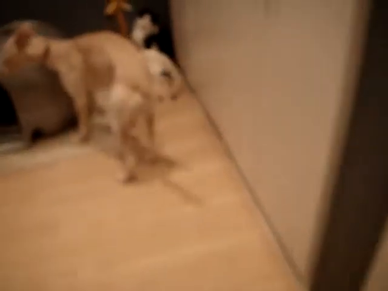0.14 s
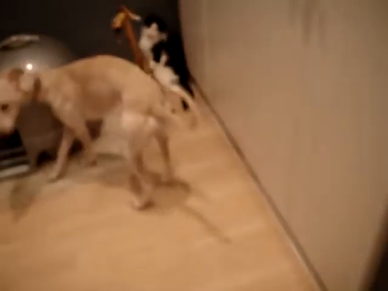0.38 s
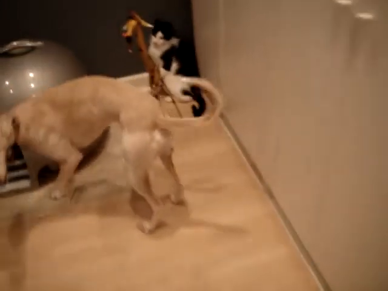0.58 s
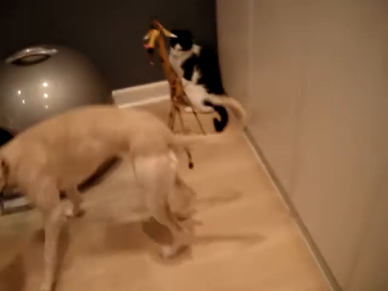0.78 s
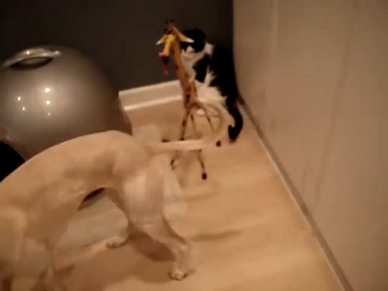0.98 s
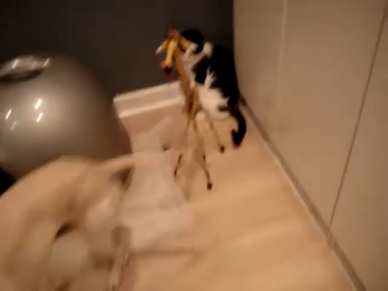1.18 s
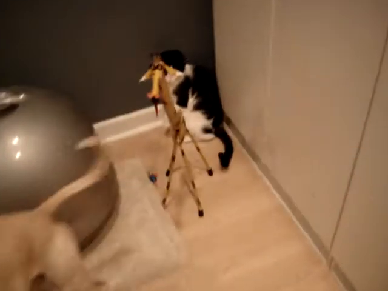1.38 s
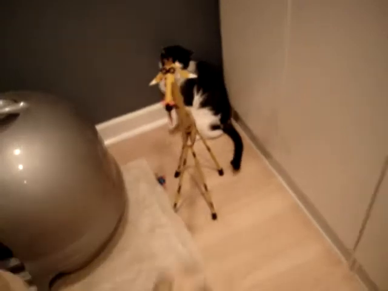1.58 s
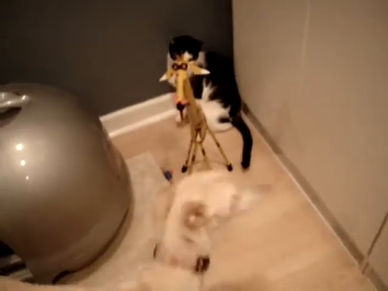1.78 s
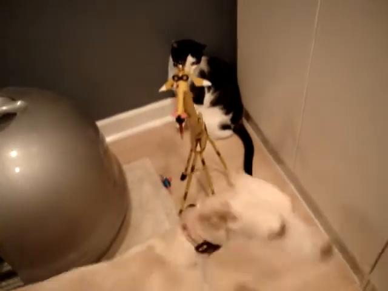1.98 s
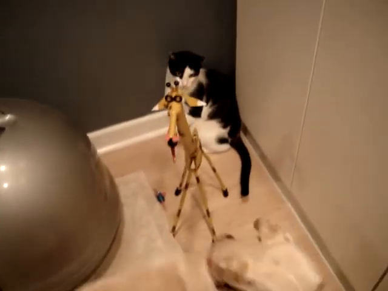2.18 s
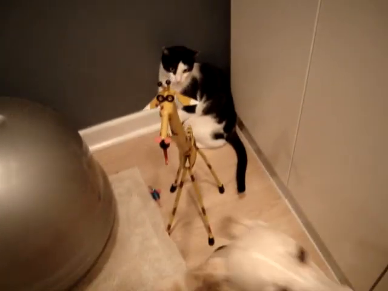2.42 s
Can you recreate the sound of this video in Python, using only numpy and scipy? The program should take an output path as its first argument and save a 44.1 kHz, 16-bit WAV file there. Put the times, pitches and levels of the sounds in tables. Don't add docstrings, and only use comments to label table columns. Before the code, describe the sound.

Dog claws skid and scrabble on a laminate floor, with panting breaths and jingling collar tags

```python
import sys
import numpy as np
from scipy import signal
from scipy.fft import rfft, irfft, next_fast_len
from scipy.io import wavfile
from scipy.ndimage import uniform_filter1d

SR = 44100
rng = np.random.default_rng(int(sys.argv[2]) if len(sys.argv) > 2 else 0)


def master_out(mix):
    frames = np.transpose(np.atleast_2d(mix))
    ceiling = np.clip(frames, -1, 1)
    pcm = np.round(ceiling * 32767).astype(np.int16)
    wavfile.write(sys.argv[1], SR, pcm)


def ratio_of_db(decibels):
    return 10 ** (np.asarray(decibels, float) / 20)


N = 108045


def band(x, low_hz, high_hz):
    return signal.sosfilt(signal.butter(2, [low_hz, high_hz], "band", fs=SR, output="sos"), x)


def rms_one(x):
    return x / np.sqrt(np.mean(x ** 2) + 1e-20)


def drift(rate_hz):
    r = np.exp(-80 * np.pi * rate_hz / SR)
    white = rng.standard_normal(N // 40 + 2002)
    slow = signal.lfilter([1], [1, -2 * r, r * r], white)[2000:]
    return np.interp(np.arange(N) / 40, np.arange(len(slow)), rms_one(slow))


def ring(x, hz, t60):
    r = ratio_of_db(-60 / (max(t60, .005) * SR))
    w = 2 * np.pi * hz / SR
    return signal.lfilter([0, np.sin(w)], [1, -2 * r * np.cos(w), r * r], x + 1e-18)


def peak(x, hz, width_hz):
    r = np.exp(-np.pi * width_hz / SR)
    poles = [1, -2 * r * np.cos(2 * np.pi * hz / SR), r * r]
    return signal.lfilter([(1 - r * r) / 2, 0, (r * r - 1) / 2], poles, x)


def grains(per_s, spread_db):
    sizes = ratio_of_db(spread_db * np.minimum(rng.exponential(1, N), 4)) * rng.choice([-1, 1], N)
    return rms_one(sizes * (rng.random(N) < per_s / SR))


def strokes(rows, source, width_oct, fall_db, swell, patchy_db):
    crest_db, attack_s, light_below_hz = 12.5, 0.00088, 247
    strike, strike_s = 0.81, 0.0016
    narrowing = 0.39
    s, db, hold, t60, hz = np.transpose(rows)[:, :, None]
    t = np.arange(0, N + 32, 16) / SR - s
    rise = np.clip(t / (hold if swell else attack_s), 0, 1)
    if not swell:
        rise = rise * (1 + strike * np.exp(-np.abs(t) / strike_s))
    fade_db = 60 * np.maximum(t - hold, 0) / t60
    power = (rise * ratio_of_db(db - crest_db - fade_db)) ** 2

    edges = 100 * 2 ** np.arange(0, 7, 1 / 3)
    mids = np.sqrt(edges[1:] * edges[:-1])
    widths_away = np.log2(mids / hz) / width_oct * np.maximum(hz / 5500, 1) ** narrowing
    share = ratio_of_db(-2 * fall_db * widths_away ** 2)
    share = share / share.sum(axis=1, keepdims=True)
    out = 0
    for k in range(len(mids)):
        gain = np.interp(np.arange(N) / 16, np.arange(t.shape[1]), np.sqrt(share[:, k] @ power))
        noise = rms_one(band(source[k % 2], edges[k], edges[k + 1]))
        out = out + gain * ratio_of_db(patchy_db * drift(31)) * noise
    return signal.sosfilt(signal.butter(4, light_below_hz, "high", fs=SR, output="sos"), out)


def knocks(rows, contact_s):
    out, size = np.zeros(N), int(contact_s * SR)
    rough = rng.standard_normal((len(rows), 2000))
    for (s, db, hz, t60), noise in zip(rows, rough):
        start = int(s * SR)
        push = np.zeros(N)
        push[start:start + size] = noise[:size] * np.linspace(1, 0, size)
        tone = peak(ring(push, hz, t60), hz, hz / 2)
        out += ratio_of_db(db) * tone / np.abs(tone).max()
    return out


# (f [Hz], level [dB per Hz])
AIR_COLOUR = [(20, -7), (256, -2.5), (340, 3), (544, -4), (1390, -5), (3020, -11.5), (4500, -7.5),
              (9000, -7.5)]
# (t [s], level [dB])
BUSTLE = [
    (0, -45.5),
    (1.3, -44.5),
    (1.39, -46.5),
    (1.501, -44.5),
    (2.17, -50.5),
    (2.27, -58),
    (2.45, -54.5),
]


def air():
    edges = 20 * 2 ** np.arange(0, 9.4, .5)
    white = rng.standard_normal((2, N))
    hz, db = np.transpose(AIR_COLOUR)
    together = drift(8)
    out = 0
    for k in range(len(edges) - 1):
        level_db = np.interp(np.log(edges[k] * 2 ** .25), np.log(hz), db)
        gain = ratio_of_db(level_db + 1.8 * drift(10) + together)
        out = out + gain * band(white[k % 2], edges[k], edges[k + 1])
    return rms_one(out) * ratio_of_db(np.interp(np.arange(N) / SR, *np.transpose(BUSTLE)))


# (t [s], length [s], f [Hz], level [dB])
WHISTLES = [(0, 1.3, 1450, -64), (.62, .2, 2450, -56), (1.0, .15, 2500, -55), (1.17, .09, 3850, -46),
            (1.995, .09, 3790, -46), (2.105, .09, 3820, -45), (2.105, .04, 3350, -49), (2.2, .1, 3780, -59),
            (2.338, .06, 3780, -51), (2.25, .1, 1400, -65), (1.88, .05, 3300, -42)]


def hollow():
    width_hz, fade_s = 130, .01
    t, white, out = np.arange(N) / SR, rng.standard_normal(N), 0
    for s, length, hz, db in WHISTLES:
        tone = peak(peak(white, hz, width_hz), hz, width_hz)
        tone = tone / uniform_filter1d(tone ** 2 + 1e-12, size=200) ** .25
        fade = np.clip(np.minimum(t - s, s + length - t) / fade_s, 0, 1)
        out = out + ratio_of_db(db) * fade * rms_one(tone)
    return out


def room(x):
    t60_s, wall_cut_hz = 0.29, 21000
    size = next_fast_len(N + SR)
    hz = np.arange(size // 2 + 1) * SR / size
    answer = 0
    for k, lag in enumerate(rng.uniform(.009, .03, 10)):
        walls = ratio_of_db(-60 * lag / t60_s) / (1 + 1j * hz / wall_cut_hz) ** 0.087
        loop = walls * np.exp(-2j * np.pi * hz * lag)
        answer = answer + (-1) ** k * loop / (1 - loop)
    return irfft(rfft(x, size) * answer, size)[:N]


# (t [s], peak level [dB], rattle [s], freedom to ring [0-1])
CLASHES = [(.196, -30.5, 0.061, 0.27), (0.3472, -24, 0.013, 0.18), (.361, -25.5, .014, 0.55),
           (.377, -27.5, 0.024, 0.2), (0.408, -31.5, .04, .15), (.468, -27.5, 0.042, 0.36),
           (.516, -36, 0.01, 0.35), (.53, -34, 0.021, 0.2), (.707, -14, 0.024, 0.93),
           (.735, -15, 0.012, .9), (.76, -24, 0.0031, .5), (.772, -26, 0.01, .3), (0.786, -33, .008, 0.3),
           (.809, -33.5, .035, 0.27), (.846, -31, 0.0085, 0.3), (0.858, -29, 0.015, .15),
           (.879, -33, 0.0065, 0.2), (.889, -30.5, .035, 0.3), (1.256, -25.5, 0.078, 0.4),
           (2.284, -39, 0.046, 0.4)]
# (multiple of its main f, level [dB], t60 [s])
TAG_MODES = [
    (1, 0, .15),
    (.986, -10, .05),
    (1.022, -8, .04),
    (1.046, -7, .03),
    (.955, -12, .03),
    (.6815, -25, .2),
    (.585, -25, .1),
]


def tags():
    main_hz, touches_per_s, damp_db_per_s = 9518, 500, 7000
    t, out = np.arange(N) / SR, np.zeros(N)
    touches = grains(touches_per_s, 1.5) * np.sqrt(touches_per_s / SR)
    for s, db, rattle, free in CLASHES:
        i, j = int(s * SR), int((s + rattle + .03) * SR)
        free = np.clip(free, .05, 1)
        hits = (.7 - .5 * free) * touches[i:j] * (t[i:j] < s + rattle)
        hits[0] = 1
        tone = 0
        for k, level_db, t60 in TAG_MODES:
            mode = peak(ring(hits, k * main_hz, t60 * free), k * main_hz, 330)
            tone = tone + ratio_of_db(level_db * (free if k > .9 else 1)) * mode
        damped_db = damp_db_per_s * np.maximum(t[i:j] - s - rattle, 0)
        out[i:j] += ratio_of_db(db - damped_db) * tone / np.abs(tone).max()
    return out


# (t [s], peak level [dB], swell [s], t60 [s], brightest f [Hz])
PANTS = [
    (-.03, -17, 0.028, 0.21, 5400),
    (.222, -19, 0.022, 0.37, 5240),
    (.468, -31, 0.13, 0.94, 5500),
    (.90, -18.5, 0.021, 0.34, 5600),
    (1.25, -17, 0.08, 0.2, 7730),
    (2.03, -16.5, 0.088, 0.31, 7170),
    (2.10, -16.5, 0.06, 0.29, 8100),
]


def panting():
    return strokes(PANTS, rng.standard_normal((2, N)), width_oct=0.96, fall_db=7, swell=True, patchy_db=1.6)


# (t [s], peak level [dB], hold [s], t60 [s], brightest f [Hz])
PADS = [(.178, -30.5, 0.029, 0.29, 513), (.5, -34.5, 0.1, 0.16, 960), (.73, -33.5, 0.017, 0.61, 694),
        (.86, -38, 0.043, .1, 895), (.93, -37.5, 0.055, 0.16, 1810), (1.148, -32.5, 0.011, 0.12, 1410),
        (1.324, -33.5, 0.01, 0.086, 690), (1.472, -23.5, 0.057, 0.038, 1120),
        (1.638, -25, 0.041, 0.14, 1300), (1.705, -24.5, 0.038, 0.22, 2700), (1.806, -25, 0.018, 0.51, 2100),
        (1.846, -27, 0.068, 0.17, 1560), (1.99, -37, 0.036, 0.26, 1010)]


def pads():
    return strokes(PADS, rng.standard_normal((2, N)), width_oct=0.62, fall_db=1.5, swell=False, patchy_db=3.5)


# (t [s], peak level [dB], board f [Hz], t60 [s])
THUMPS = [(.0, -43, 182, 0.067), (.178, -48, 382, .3), (.178, -46.5, 59.4, 0.1), (.178, -47, 130, 0.074),
          (.575, -51, 157, .19), (.735, -48, 39.7, 0.22), (1.48, -29.5, 320, 0.092),
          (1.494, -28, 332, 0.074), (1.52, -33.5, 378, .04), (1.482, -33.5, 1137, .1),
          (1.498, -33.5, 700, 0.071), (1.523, -32.5, 1055, 0.037), (1.535, -47, 80, 0.071),
          (1.654, -30, 472, 0.077), (1.654, -32, 670, 0.043), (1.69, -40, 700, .05), (1.705, -39, 392, .05),
          (1.843, -41.5, 213, 0.17), (1.972, -43.5, 166, 0.22)]


def thumps():
    return knocks(THUMPS, contact_s=0.015)


# (t [s], peak level [dB], f [Hz], t60 [s])
TICKS = [(.224, -33.5, 3810, .1), (1.149, -24.5, 4630, .03), (1.349, -12.5, 6680, .04),
         (1.483, -15.5, 4950, .05), (1.50, -22, 4700, .06), (1.658, -23, 4500, .025), (1.7, -23, 4900, .04),
         (1.8, -28, 5760, 0.018), (1.848, -21.5, 4650, 0.071), (1.3, -37, 3500, 0.035),
         (1.71, -23, 6340, .04)]


def ticks():
    return knocks(TICKS, contact_s=0.013)


# (t [s], peak level [dB], f [Hz], t60 [s])
TAPS = [
    (1.4715, -26, 1250, 0.011),
    (1.638, -26.5, 1230, 0.013),
    (1.659, -30.5, 650, .01),
    (1.6645, -23, 680, 0.009),
    (1.807, -23.5, 2800, 0.028),
    (1.806, -31, 2120, .015),
    (.18, -36.5, 1220, 0.0066),
]


def taps():
    return knocks(TAPS, contact_s=0.0028)


# (t [s], peak level [dB], hold [s], t60 [s], brightest f [Hz])
SKIDS = [(.18, -26.5, 0.011, 0.24, 3780), (.495, -24, 0.076, 0.22, 5000), (.575, -13, 0.02, 0.22, 5530),
         (.94, -16.5, 0.01, 0.17, 5180), (1.098, -22.5, 0.035, .18, 6000), (1.148, -16, 0.02, 0.49, 5940),
         (1.175, -43, .05, 0.12, 4800), (1.322, -12, 0.05, 0.19, 8000), (1.347, -9, 0.016, 0.07, 7200),
         (1.385, -14, 0.094, 0.53, 8400), (1.46, -12.5, 0.09, 0.35, 8900),
         (1.484, -11.5, 0.051, 0.41, 5600), (1.533, -10, 0.019, 0.088, 7500),
         (1.56, -15.5, 0.081, 0.17, 8160), (1.657, -8, 0.0076, 0.39, 6300), (1.71, -8, 0.0045, 0.25, 8000),
         (1.838, -6.5, 0.0072, 0.33, 6760), (1.88, -10, 0.027, 0.37, 6670),
         (1.993, -15.5, 0.017, 0.34, 6600), (2.341, -27, 0.071, 0.34, 5940)]


def claws():
    scrape = [grains(2000, 3) + rng.standard_normal(N) for _ in range(2)]
    return strokes(SKIDS, scrape, width_oct=0.92, fall_db=5.5, swell=False, patchy_db=1.5)


# (f [Hz], width [Hz], level added [dB])
SURFACE = [
    (3810, 190, -11),
    (4900, 1400, -15.5),
    (6600, 170, -11.5),
    (8650, 960, 0.5),
]


def surface(rub):
    return rub + sum(ratio_of_db(db) * peak(rub, hz, width_hz) for hz, width_hz, db in SURFACE)


def scene():
    rub = surface(claws() + panting())
    near = 0.65 * rub + pads() + thumps() + ticks() + taps()
    jingle = tags()
    echoes = ratio_of_db(-20.5) * room(near + 0.24 * jingle)
    mono = near + jingle + echoes + air() + hollow()
    return np.array([mono, mono])


# (t [s], length [s], from f [Hz], to f [Hz])
LOSSES = [(.165, .011, 4800, 6300), (.442, .02, 9100, 11000), (.488, .005, 3800, 5600),
          (.559, .013, 4900, 9000), (.895, .010, 5200, 8600), (.93, .01, 6000, 7500),
          (1.134, .010, 4900, 11000), (1.372, .011, 4100, 5700), (1.372, .009, 8200, 9500),
          (1.378, .004, 5700, 7300), (1.556, .005, 5200, 6800), (1.527, .012, 9700, 11000),
          (1.46, .022, 4600, 5400), (1.783, .018, 2550, 2950), (2.325, .01, 3500, 4000),
          (.797, .01, 8900, 11000), (2.168, .006, 6000, 8000), (1.639, .016, 4600, 5800),
          (1.821, .016, 4900, 11000), (2.01, .016, 5200, 5900), (2.322, .019, 5200, 8800)]


def dropouts(x):
    loss_db, hole_db, flutter_db = -40, -28, 3.0
    hole_share, hole_top_share = .09, .2
    hz, t, cells = signal.stft(x, SR, nperseg=256, noverlap=224)
    lost = np.zeros(cells.shape)
    for s, length, low_hz, high_hz in LOSSES:
        inside = np.clip(np.minimum(t - s, s + length - t) / .002 + 1, 0, 1)
        lost = np.maximum(lost, np.outer((hz > low_hz) & (hz < high_hz), inside))
    chance = rng.random((2, 40, len(t) // 8 + 1))
    chance = chance[:, (hz // 700).astype(int)][:, :, np.arange(len(t)) // 8]
    treble = hz > 4900
    wobble_db = flutter_db * np.sqrt(12) * (chance[1] - .5) * treble[:, None]
    holes = chance[0] < np.where(hz > 9500, hole_top_share, hole_share * treble)[:, None]
    cells = cells * ratio_of_db(loss_db * lost + uniform_filter1d(hole_db * holes + wobble_db, size=4))
    return signal.istft(cells, SR, nperseg=256, noverlap=224)[1][:N]


def side_trace():
    noise = band(band(rng.standard_normal(N), 7600, 9700), 7600, 9700)
    gate = np.clip(1.5 - np.abs(np.arange(N) / SR - 1.6) / .012, 0, 1)
    return ratio_of_db(-33) * rms_one(noise) * gate


def band_limit(x):
    return signal.sosfilt(signal.butter(12, 11130, fs=SR, output="sos"), x)


def record(dry):
    heard = dry[0] + .2 * band(dry[0] ** 2, 8.6, 51)
    mono, side = dropouts(heard), side_trace()
    top_cut = signal.ellip(12, .5, 80, 10050, fs=SR, output="sos")
    mix = signal.sosfilt(top_cut, [mono + side, mono - side])
    return band_limit(mix)


dry = scene()
out = record(dry)
master_out(out)
```